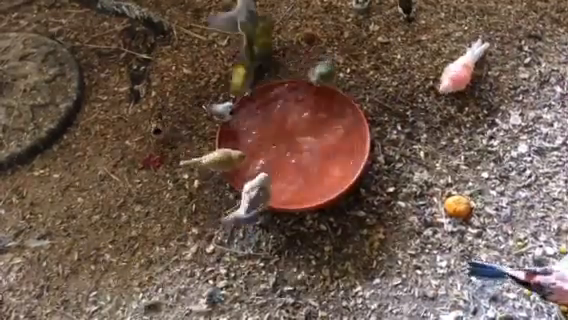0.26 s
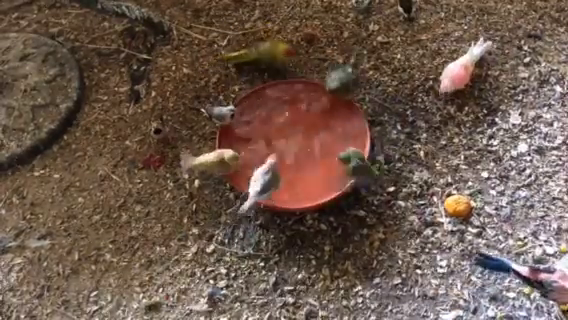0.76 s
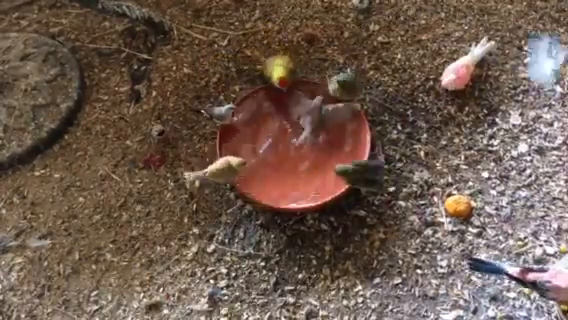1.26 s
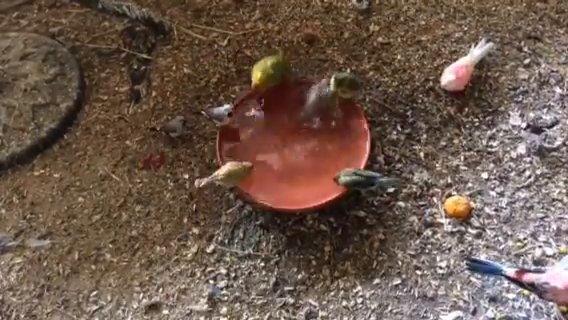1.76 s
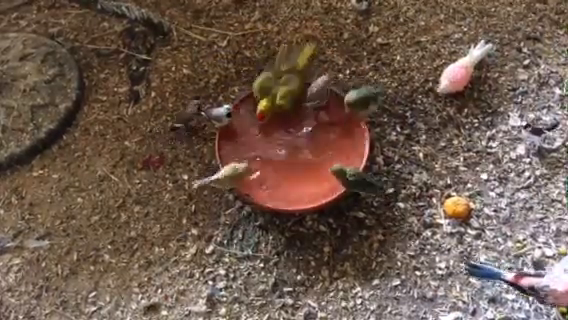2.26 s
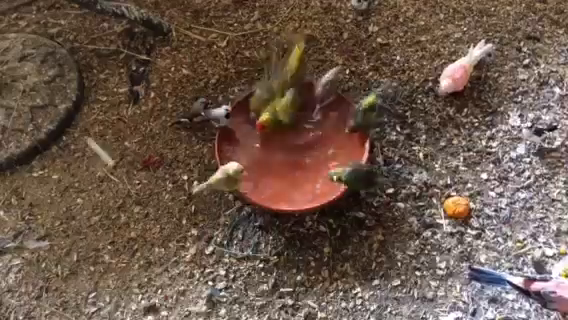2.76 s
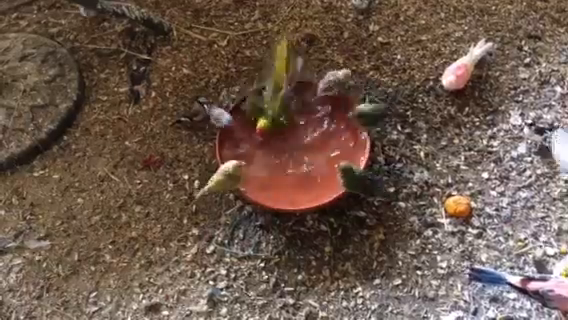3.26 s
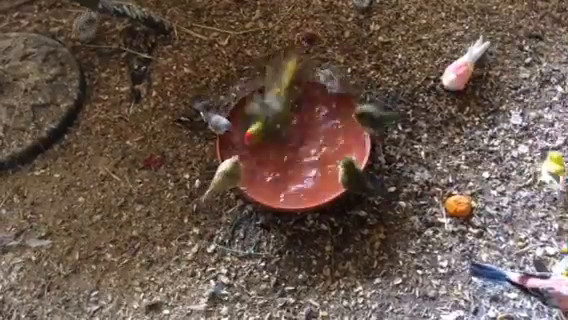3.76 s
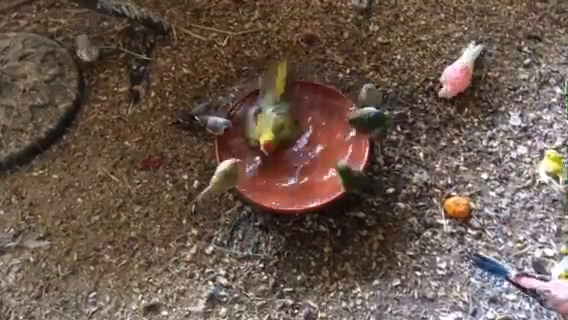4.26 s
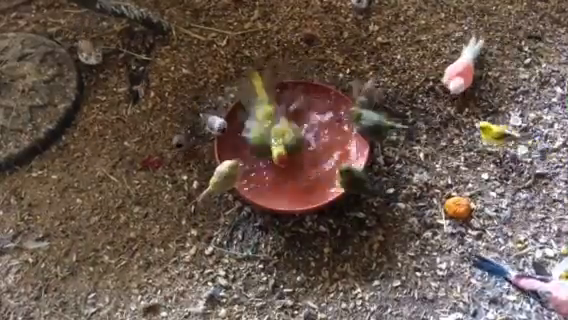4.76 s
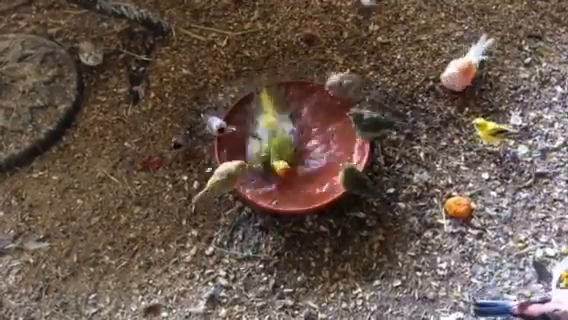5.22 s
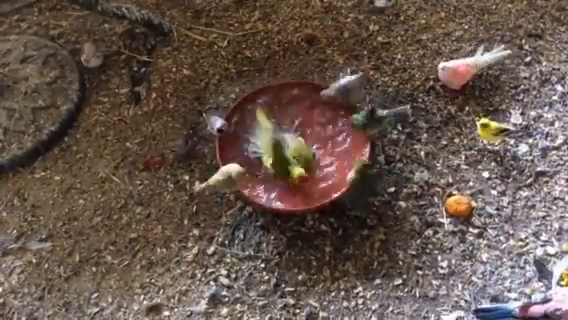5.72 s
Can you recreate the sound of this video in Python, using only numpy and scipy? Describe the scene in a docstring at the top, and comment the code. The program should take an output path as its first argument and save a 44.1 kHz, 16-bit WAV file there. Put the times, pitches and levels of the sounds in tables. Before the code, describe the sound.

Fine droplets, plops and little bubbles come from a bathing dish, close and crisp, while finches call slightly further off with more room around them. Early wing whirr fades into sparse water ticks and chirps; a hoarse squawk interrupts, then splashing thickens with trills and rising whistles. Low, fast wing thumps and the strongest splashes finish the scene over soft air noise and distant chatter.

```python
"""Droplets tick and plop as small cage birds bathe in a shallow dish in an aviary, a couple of metres off.
Noise bursts, ringing drops, bubbles and filtered spray make the water; wing beats are low throbbing noise
and ringing puffs, strongest at the end. Gliding, trembling tones make finch chips, trills and whistles,
a parakeet squawk and dove coos, with a diffuse tail. Shaped noise gives a soft outdoor hum."""
import sys
import numpy as np
from scipy import signal
from scipy.fft import rfft, irfft
from scipy.io import wavfile
from scipy.ndimage import uniform_filter1d

SR = 44100
rng = np.random.default_rng(int(sys.argv[2]) if len(sys.argv) > 2 else 0)


def materialize(psi):
    """Save the field psi as 16-bit PCM at rate SR to the path in sys.argv[1].

    A 1-D psi becomes a single channel; in a 2-D psi each row is a channel.
    """
    bounded = np.clip(np.atleast_2d(psi).T, -1, 1)
    quanta = np.round(bounded * 32767).astype(np.int16)
    wavfile.write(sys.argv[1], SR, quanta)


N = 264159
T_S = np.arange(N) / SR

# Columns named rel_* are scaled or offset where used.
# outdoor noise spectrum: freq_hz, rel_density_db
AIR_SPECTRUM = [(15, -49), (25, 1), (97, 5), (285, -1.5), (591, -13), (936, -9), (3430, -13.5), (4490, -22),
                (14400, -39), (16000, -42)]
# far chatter: time_s, level_db
FLOCK_LEVELS = [(0, -65.5), (1.8, -66), (2.3, -75), (4.5, -76), (5.99, -59.5)]
# air puff bands: low_hz, high_hz, rel_level_db
PUFF_BANDS = [(31, 208, 1.5), (81.4, 102.7, -1), (151.3, 196, -2)]
# wing beats: time_s, rel_puff_db, rel_whirr_db
WING_LEVELS = [(0.0, -57, -58.5), (0.09, -52, -58.5), (0.27, -53.5, -59.5), (0.42, -48.5, -61),
               (0.51, -48.5, -51), (0.84, -52.5, -53), (0.92, -57, -61.5), (1.05, -50, -61),
               (1.99, -60.5, -65), (2.36, -59, -66), (2.43, -54.5, -56), (2.7, -57.5, -65),
               (3.05, -53, -59), (3.149, -59, -62.5), (3.4, -54.5, -62.5), (4.25, -56, -61.5),
               (4.3, -64.5, -65.5), (5.1, -56.5, -64), (5.14, -47.5, -57.5), (5.5, -39.5, -47),
               (5.62, -49.5, -56), (5.71, -36.5, -43), (5.94, -49.5, -50.5), (5.99, -42, -42)]
# close downstrokes: start_s, rel_thump_db, thump_hz, rel_slap_db
DOWNSTROKES = [(0.078, -36, 196, -53), (0.39, -33, 94.6, -47), (0.44, -39, 94.4, -48),
               (5.139, -35.5, 41.6, -51), (5.19, -30.5, 181, -49), (5.204, -37, 85, -37.5),
               (5.3, -34, 41.4, -38.5), (5.324, -26.5, 175, -37.5), (5.397, -36.5, 93, -46),
               (5.454, -20.5, 210, -41), (5.52, -36, 78, -25), (5.668, -30.5, 87.5, -40),
               (5.72, -24.5, 162, -27.5), (5.827, -25.5, 185, -24), (5.884, -34, 59.2, -33),
               (5.979, -38, 41, -43)]
# two-voiced trills: start_s, length_s, rel_upper_hz, rel_upper_db, rel_lower_db
TRILLS = [(1.272, .2, 4950, -46.5, -51), (2.009, 0.22, 5058, -39.5, -47.5), (3.689, 0.22, 4850, -42, -50.5),
          (4.788, 0.22, 4840, -42.5, -47.5), (5.774, 0.21, 4746, -42.5, -51)]
# shape of every trill: length_share, upper_pitch_ratio, upper_db, upper_waver_ratio, lower_hz, lower_db
TRILL_SHAPE = [(0, .94, -15, 0.027, 3660, -2), (.1, 0.97, -5.5, 0.03, 3650, -6),
               (.25, 0.99, 0.5, 0.0304, 3650, -7.5), (.48, .98, -8.5, 0.0515, 3700, -2),
               (.62, .93, -17, .05, 4050, 0.5), (1, .9, -26, 0.046, 4010, -11)]
# rising, then held whistles: start_s, top_hz, start_db, top_db
WHISTLES = [(3.598, 4450, -54, -48.5), (4.351, 4640, -49, -46), (5.038, 4530, -52, -40)]
# low coos: start_s, length_s, start_hz, glide_hz, peak_db, octave_peak_db
COOS = [(1.958, 0.052, 1561, 73, -46, -50), (2.363, 0.062, 990, 36, -57, -69),
        (3.457, 0.13, 1032, -39, -52.5, -59), (3.59, 0.057, 1164, -65, -44.5, -63),
        (3.661, 0.071, 1288, 149, -47, -67), (3.728, .13, 1112, -77, -60, -58),
        (4.555, .08, 220, -25, -46, -62)]
# hoarse squawk contour: time_s, pitch_hz, level_db, rel_overtones_db
SQUAWK = [(2.739, 1610, -65, -55), (2.766, 1751, -40.5, -40), (2.793, 1976, -34.5, -34),
          (2.851, 2013, -35.5, -40.5), (2.909, 2131, -38, -37.5), (2.947, 2240, -41, -57),
          (2.978, 2170, -66, -60)]
# squawk overtones: pitch_multiple, rel_level_db
SQUAWK_PARTIALS = [(2, -0.5), (2.45, -13), (3, -9), (4, -24), (5, -29), (6, -30)]
# squawk second voice: peak_s, peak_db, slope_db_per_s
SECOND_VOICE = (2.851, -39.5, 260)
# chips, high tip then hoarse burst: burst_s, burst_mid_hz, burst_start_db, tip_start_db
CHIPS = [(0.139, 4130, -45, -52), (0.442, 5060, -51, -58.5), (0.826, 4600, -54, -53),
         (0.957, 3990, -40, -48), (1.783, 4200, -46, -47), (3.289, 4100, -42, -51), (4.083, 4000, -56, -72),
         (4.228, 3500, -53, -76), (4.3, 3300, -56, -75)]
# low hoarse chucks: start_s, mid_hz, rel_level_db, length_s
CHUCKS = [(.3, 1232, -45.5, 0.039), (1.073, 1494, -49, 0.029), (1.356, 1425, -49.5, 0.066),
          (2.26, 1380, -49.5, 0.063), (2.55, 2900, -56, 0.028), (3.6, 2140, -52, 0.26),
          (4.532, 2080, -50, .038)]
# droplets: start_s, rel_peak_db, centre_hz
TICKS = [(0.046, -32, 7000), (0.5671, -32.5, 6800), (0.611, -26.5, 12400), (0.658, -31.5, 8800),
         (0.7467, -33.5, 7800), (1.046, -37, 11900), (1.5708, -37.5, 12900), (1.857, -30, 13200),
         (1.9823, -22.5, 9000), (2.6397, -23.5, 12500), (3.1142, -29, 6800), (3.174, -31, 6800),
         (3.254, -30, 6140), (3.6117, -19, 11300), (3.6701, -36.5, 7400), (3.7329, -36, 6460),
         (3.7483, -31, 6900), (3.898, -19.5, 6300), (4.517, -33, 7010), (4.6562, -30.5, 8500),
         (4.6938, -28.5, 7900), (4.814, -28, 7300), (4.8677, -30, 7100), (4.955, -29, 7550),
         (4.9656, -21.5, 8600), (5.0432, -23, 7240), (5.107, -28, 6300), (5.2033, -27.5, 6300),
         (5.276, -30, 6970), (5.4208, -27, 7400), (5.5131, -11, 6500), (5.746, -25, 7550),
         (5.8298, -14, 5730), (5.8985, -30, 11000), (5.9668, -30, 10500)]
# bigger drops: start_s, rel_level_db, ring_hz
PLOPS = [(0.109, -44, 1590), (0.155, -42, 1770), (0.277, -46, 1270), (0.6602, -40, 1820),
         (1.8204, -40.5, 1890), (2.0847, -45, 2060), (2.8004, -27.5, 1980), (3.0698, -41, 1700),
         (3.233, -46, 2220), (3.896, -41, 1590), (4.7115, -34, 1970), (4.807, -41, 2040),
         (4.8224, -33.5, 2170), (5.0188, -27.5, 3320), (5.04, -39, 3040), (5.192, -42, 2470),
         (5.2036, -41, 1780), (5.4615, -37, 2100), (5.4948, -33, 2020), (5.519, -17, 2480),
         (5.5262, -33, 2680), (5.6171, -31.5, 2380), (5.7148, -30, 1870), (5.7455, -24.5, 2170),
         (5.764, -41, 2200), (5.828, -20.5, 1380), (5.8367, -19.5, 2580), (5.8475, -24.5, 1800),
         (5.9493, -40, 2090)]
# surfacing bubbles, and among them a short clean chuck (1.086 s) and a thin peep (1.449 s): start_s, start_hz,
# end_hz, length_s, start_db
BUBBLES = [(1.086, 1074, 1147, 0.02, -46.5), (1.449, 1646, 1780, 0.017, -46.5),
           (2.571, 1120, 1250, 0.028, -58), (3.153, 1104, 1330, 0.015, -49.5),
           (4.693, 1900, 2680, 0.0097, -40), (4.765, 1164, 1310, 0.015, -47.5),
           (4.848, 1200, 2350, .028, -36.5), (4.891, 1240, 2265, 0.027, -42),
           (5.018, 1610, 1920, 0.014, -44.5)]
# wing slaps on the water: time_s, rel_wash_db
SLAPS = [(0.046, -28), (1.9814, -31), (2.6414, -24), (3.1133, -24), (3.256, -29.5), (3.406, -26.5),
         (3.616, -25), (3.7474, -31), (3.894, -21), (4.3683, -22), (4.514, -27), (4.693, -24.5),
         (4.8125, -30), (4.963, -28), (5.278, -25.5), (5.515, -12), (5.744, -21), (5.826, -8)]
# splashing: time_s, rel_fine_db, rel_slosh_db
SPRAY = [(0.0, -54, -54), (1.28, -56.5, -56.5), (1.67, -62.5, -60), (2.08, -59.5, -55.5),
         (2.32, -60.5, -61.5), (2.62, -58, -54.5), (2.88, -53.5, -49), (3.15, -60, -55.5),
         (3.37, -53.5, -58), (3.74, -50.5, -47.5), (3.94, -56, -57.5), (4.3, -63.5, -62),
         (4.799, -51.5, -51), (5.2, -51.5, -55), (5.54, -47, -47), (5.7, -46.5, -55.5), (5.99, -45, -47)]

AIR_DB, AVIARY_T60_S, AVIARY_DB, TOP_HZ = -60, 0.24, -5.5, 15450
FLOCK_HZ, SECOND_VOICE_HZ = 3890, 3284
WHISTLE_START_RATIO, RISE_S, HOLD_S, RELEASE_S, RELEASE_DB = .87, .035, .02, .012, -20
COO_PEAK_SHARE, COO_IN_DB, COO_OUT_DB = 0.29, -14, -19
CHIP_S, TIP_LEAD_S, TIP_HZ = .027, .008, 5900


def undb(db):
    """Decibels to amplitude ratio."""
    return 10 ** (np.asarray(db) / 20)


def band(x, lo_hz, hi_hz):
    """Band-pass."""
    sos = signal.butter(2, [lo_hz, min(hi_hz, .45 * SR)], "band", fs=SR, output="sos")
    return signal.sosfilt(sos, x)


def unit(x):
    """Scale to standard deviation 1."""
    return x / np.std(x)


def noise_band(lo_hz, hi_hz, size=N):
    """Band of noise, spread 1."""
    return unit(band(rng.standard_normal(size), lo_hz, hi_hz))


def walk(rate_hz, size=N):
    """Smooth random wander, spread 1, about rate_hz turns a second."""
    k = max(int(SR / rate_hz), 1)
    noise = rng.standard_normal(size + 2 * k)
    return unit(uniform_filter1d(uniform_filter1d(noise, k), k))[k:k + size]


def add(out, start_s, x):
    """Mix x into out from start_s."""
    i = int(start_s * SR)
    out[i:i + len(x)] += x[:len(out) - i]


def ring(out, start_s, db, hz, cycles):
    """A drop or a puff rings, falling by a factor e every given number of cycles."""
    turns = np.arange(int(4 * cycles * SR / hz)) * hz / SR
    envelope = np.minimum(turns / 0.34, 1) * np.exp(-turns / cycles)
    add(out, start_s, undb(db) * np.sin(2 * np.pi * turns) * envelope)


def spit(out, start_s, peak_db, hz):
    """A droplet bursts in a millisecond or two of noise, coloured by its size."""
    t = np.arange(SR // 100) / SR
    burst = band(rng.standard_normal(len(t)) * t * np.exp(-t / .0008), .7 * hz, 1.4 * hz)
    add(out, start_s, undb(peak_db) * burst / np.abs(burst).max())


def sing(out, s, hz, db, waver, flutter_db, partials=((1, 0),)):
    """A syrinx tone on straight-line contours; pitch (waver, a ratio) and level tremble."""
    t = np.arange(s[0], s[-1], 1 / SR)
    depth = np.interp(t, s, waver * np.ones(len(s)))
    pitch_hz = np.interp(t, s, hz) * (1 + depth * walk(550, size=len(t)))
    phase = 2 * np.pi * np.cumsum(pitch_hz) / SR
    tone = sum(undb(level_db + flutter_db * walk(288, size=len(t))) * np.sin(multiple * phase)
               for multiple, level_db in partials)
    envelope = undb(np.interp(t, s, db)) * signal.windows.tukey(len(t), .1)
    add(out, s[0], np.sqrt(2) * tone * envelope)


def air():
    """Steady outdoor hum and microphone hiss: noise with a shaped spectrum."""
    hz = np.maximum(np.arange(N // 2 + 1) * SR / N, 1)
    point_hz, point_db = np.transpose(AIR_SPECTRUM)
    shape = undb(np.interp(np.log(hz), np.log(point_hz), point_db))
    return unit(irfft(rfft(rng.standard_normal(N)) * shape, N)) * undb(AIR_DB)


def aviary(x):
    """Walls and roof return a diffuse, fading tail."""
    t = np.arange(SR // 2) / SR
    decay = np.exp(-np.log(1000) * t / AVIARY_T60_S)
    tail = band(rng.standard_normal(len(t)), 280, 9700) * decay * (t > .004)
    return signal.fftconvolve(x, tail / np.linalg.norm(tail))[:N]


def flock():
    """Faint far chatter: narrow noise with a wandering level."""
    chatter = noise_band(0.95 * FLOCK_HZ, 1.06 * FLOCK_HZ)
    return undb(np.interp(T_S, *np.transpose(FLOCK_LEVELS)) + 3.5 * walk(25)) * chatter


def wings():
    """Air puffs and feather whirr throb with the uneven wing beat; close downstrokes thump."""
    s, puff_db, whirr_db = np.transpose(WING_LEVELS)
    beat = np.cos(2 * np.pi * np.cumsum(19 * (1 + 0.152 * walk(4.6))) / SR)  # about 19 Hz
    # the hollow under the roof favours two low notes
    puff = unit(sum(undb(db) * noise_band(lo_hz, hi_hz) for lo_hz, hi_hz, db in PUFF_BANDS))
    puff *= undb(np.interp(T_S, s, puff_db) - 0.5 + 1.7 * beat)
    whirr = noise_band(223, 692) * undb(np.interp(T_S, s, whirr_db) + 3.57 * beat)
    out = puff + whirr
    t = np.arange(SR // 8) / SR
    for start_s, thump_db, hz, slap_db in DOWNSTROKES:
        ring(out, start_s, thump_db + 2.5, hz, cycles=1.44)
        # wet feathers clap as the air is pushed
        clap = noise_band(140, 1400, len(t)) * np.minimum(t / 0.0037, 1) * np.exp(-t / 0.018)
        add(out, start_s - .004, undb(slap_db - 2.5) * clap)
    return out


def trills(out):
    """Finch trills: two wavering syrinx voices, the upper one with a rasp around it."""
    share, ratio, upper_shape_db, waver, lower_hz, lower_shape_db = np.transpose(TRILL_SHAPE)
    for start_s, length_s, hz, upper_db, lower_db in TRILLS:
        s = start_s + length_s * share
        level_db = upper_db + upper_shape_db
        sing(out, s, hz * ratio, level_db, waver, flutter_db=4.5)
        sing(out, s, hz * ratio, level_db - 8, waver=0.12, flutter_db=5.0)  # rasp
        sing(out, s, lower_hz, lower_db + lower_shape_db, waver=0.069, flutter_db=4.5)


def whistles(out):
    """Finch whistles: a single tone rises, holds the top and releases."""
    for start_s, hz, start_db, db in WHISTLES:
        s = start_s + np.cumsum([0, RISE_S, HOLD_S, RELEASE_S])
        sing(out, s, [WHISTLE_START_RATIO * hz, hz, hz, hz],
             [start_db, db, db, db + RELEASE_DB], waver=0.012, flutter_db=3.5)


def coos(out):
    """Dove coos: a gliding low tone and its octave swell and fade."""
    share, swell_db = np.array([0, COO_PEAK_SHARE, 1]), np.array([COO_IN_DB, 0, COO_OUT_DB])
    for start_s, length_s, hz, glide_hz, db, octave_db in COOS:
        s, pitch_hz = start_s + length_s * share, hz + glide_hz * share
        sing(out, s, pitch_hz, db + swell_db, waver=0.025, flutter_db=1.5)
        sing(out, s, 2 * pitch_hz, octave_db + swell_db, waver=0.0017, flutter_db=8.5)


def squawk(out):
    """Parakeet squawk: a rising tone with overtones, rasp and a second syrinx voice."""
    s, hz, db, overtone_db = np.transpose(SQUAWK)
    sing(out, s, hz, db, waver=0.031, flutter_db=2.5)
    sing(out, s, hz, overtone_db, waver=0.0289, flutter_db=4.5, partials=SQUAWK_PARTIALS)
    # air rasping past the membranes fills the gaps between overtones
    sing(out, s, hz, overtone_db - 4.5, waver=0.1366, flutter_db=0.5, partials=SQUAWK_PARTIALS)
    # the other side of the syrinx holds its own note
    peak_s, peak_db, slope_db_per_s = SECOND_VOICE
    second_db = peak_db - slope_db_per_s * np.abs(s - peak_s)
    sing(out, s, SECOND_VOICE_HZ + 0 * s, second_db, waver=0.034, flutter_db=3.0)


def chips_and_chucks(out):
    """Short calls: falling hoarse chips with a high tip ahead; rising hoarse chucks with partials."""
    for s, burst_hz, burst_db, tip_db in CHIPS:
        tip_s = s - TIP_LEAD_S
        sing(out, [tip_s, tip_s + CHIP_S], [TIP_HZ, TIP_HZ], [tip_db, tip_db - 12.5],
             waver=0.045, flutter_db=0.0)
        sing(out, [s, s + CHIP_S], [1.03 * burst_hz, .97 * burst_hz], [burst_db, burst_db - 5],
             waver=0.092, flutter_db=2.5)
    for s, hz, db, length_s in CHUCKS:
        sing(out, [s, s + length_s], [.95 * hz, 1.05 * hz], [db, db - 8.0],
             waver=0.0995, flutter_db=3.0, partials=((1, -3.0), (1.5, -10.5), (2, -4.0)))


def birds():
    """All calls over the far flock."""
    out = flock()
    for call in (trills, whistles, coos, squawk, chips_and_chucks):
        call(out)
    return out


def drops(out):
    """Droplets burst, bigger drops ring, bubbles rise in pitch as they surface, and a short chuck and a peep
    glide up the same way."""
    for s, db, hz in TICKS:
        spit(out, s, db - 2.0, hz)
    for s, db, hz in PLOPS:
        ring(out, s, db + 7.5, hz, cycles=2.17)
    for s, start_hz, end_hz, length_s, db in BUBBLES:
        sing(out, [s, s + length_s], [start_hz, end_hz], [db, db], waver=0.0036, flutter_db=2.1)


def slap_wash():
    """Spray gain: builds from just before each wing slap, then thins out."""
    wash = np.zeros(N)
    t = np.arange(SR // 5) / SR
    for s, db in SLAPS:
        add(wash, s - .007, undb(db - 14) * np.minimum(t / 0.0092, 1) ** 2 * np.exp(-t / 0.014))
    return wash


def sloshing(s, slosh_db):
    """Countless tiny bubbles, each with its own pitch, over a band of hiss."""
    gurgle = np.zeros(N)
    for when, pitch, size in rng.random((2500, 3)):
        ring(gurgle, when * N / SR, 12 * size + 4.0 * pitch, 1150 * 3.5 ** pitch, cycles=2.3)
    mix = unit(gurgle) + 1.12 * noise_band(840, 5660)
    return mix * undb(np.interp(T_S, s, slosh_db) - 4.0 + 2 * walk(22))


def water():
    """Drops and bubbles, fine crackling spray with slap washes, stray droplets and sloshing."""
    out = np.zeros(N)
    drops(out)
    s, fine_db, slosh_db = np.transpose(SPRAY)
    # sparse impacts of spread size over hiss
    impacts = (rng.random(N) < .006) * undb(6.5 + 10 * rng.random(N))
    crackle = rng.standard_normal(N) * (1 + impacts)
    fine = unit(band(crackle, 2500, 15100)) + undb(-5.5) * unit(band(crackle, 1320, 2650))
    # stray droplets, louder where the spray is thick
    for when, pitch, size in rng.random((260, 3)):
        start_s = when * N / SR
        spit(out, start_s, np.interp(start_s, s, fine_db) + 8.5 + 8 * size, 3000 * 4.0 ** pitch)
    fine_gain = slap_wash() + undb(np.interp(T_S, s, fine_db) - 4.5 + 2.9 * walk(38))
    return out + fine * fine_gain + sloshing(s, slosh_db)


def scene():
    """Sum of direct sources, aviary tail and outdoor air."""
    calls, splash = birds(), water()
    # the dish is near and the callers perch further off, so calls carry more of the room
    room = undb(AVIARY_DB) * aviary(calls + undb(-7) * splash)
    return (calls + splash + room + wings() + air())[None]


def record(dry):
    """The recorder cuts the top: steep elliptic low-pass."""
    return signal.sosfilt(signal.ellip(10, .2, 60, TOP_HZ, fs=SR, output="sos"), dry)


dry = scene()
out = record(dry)
materialize(out)
```